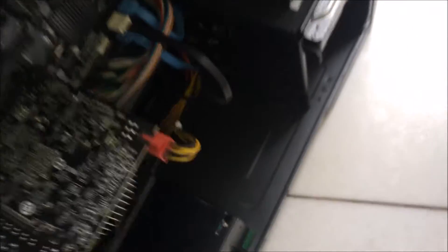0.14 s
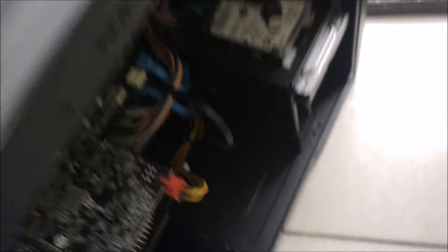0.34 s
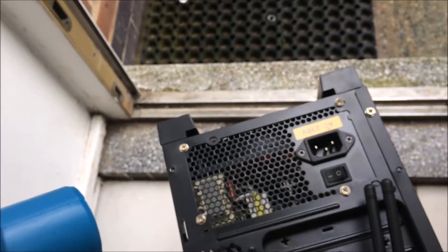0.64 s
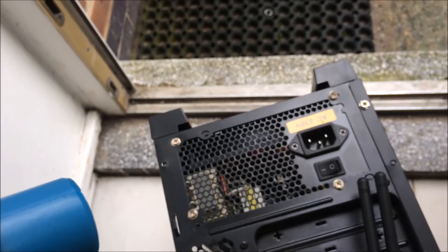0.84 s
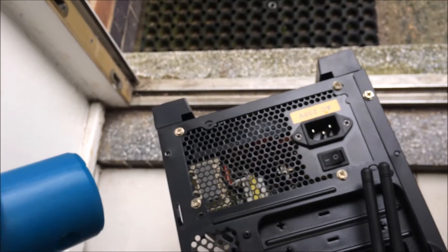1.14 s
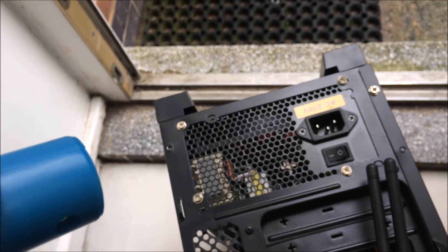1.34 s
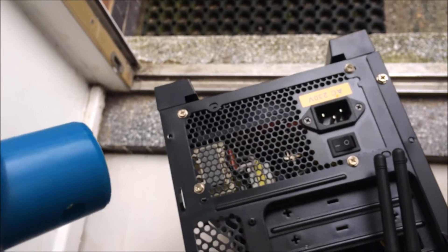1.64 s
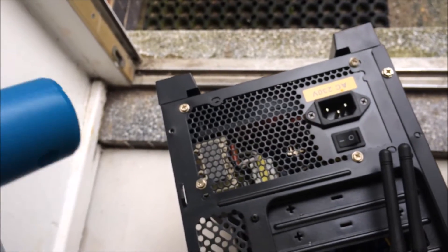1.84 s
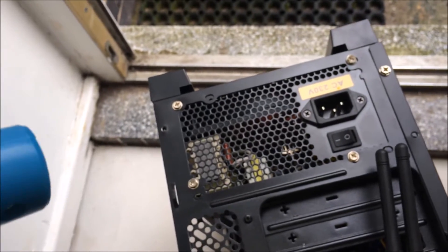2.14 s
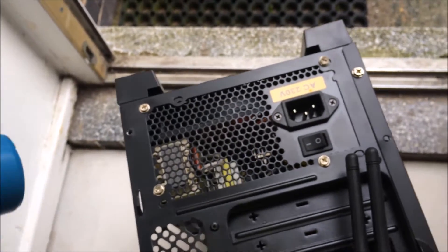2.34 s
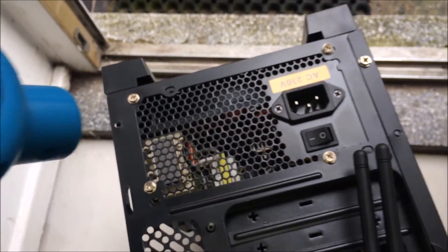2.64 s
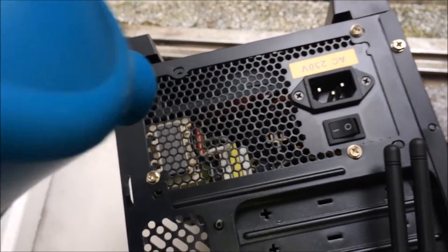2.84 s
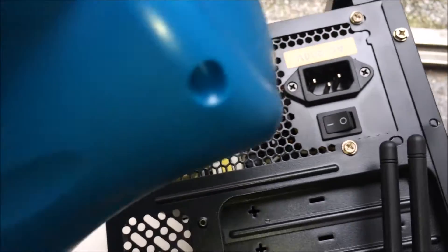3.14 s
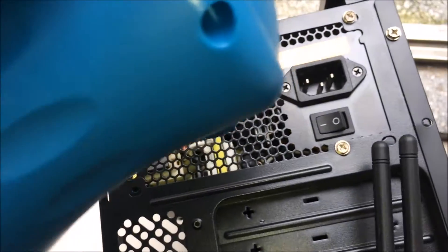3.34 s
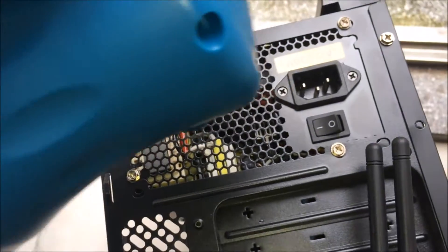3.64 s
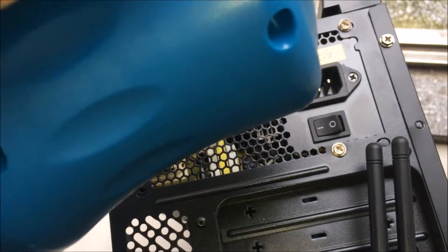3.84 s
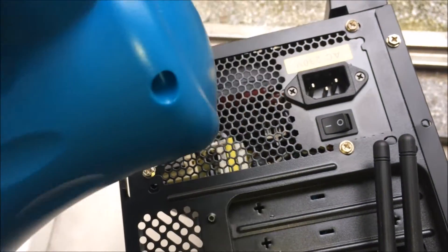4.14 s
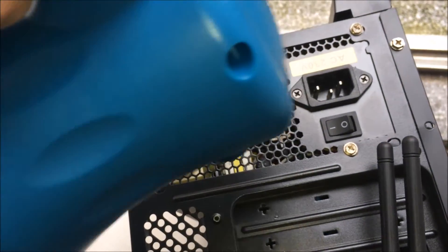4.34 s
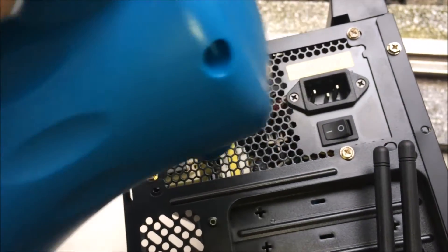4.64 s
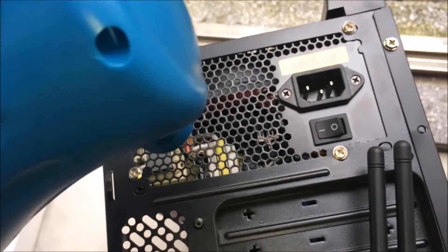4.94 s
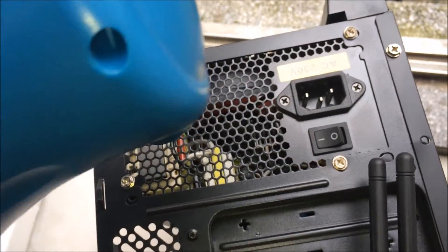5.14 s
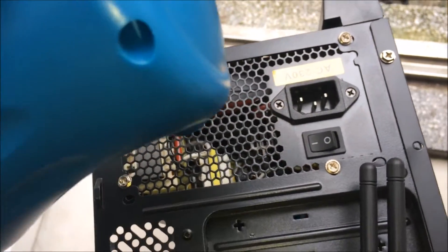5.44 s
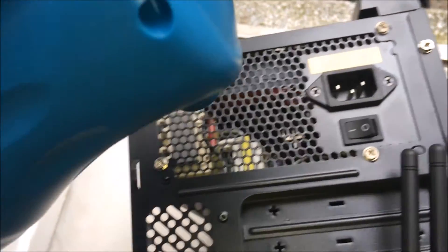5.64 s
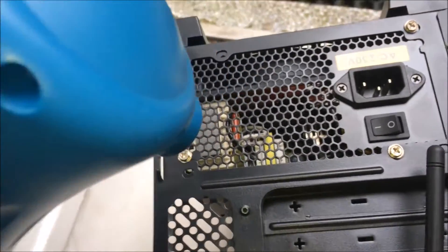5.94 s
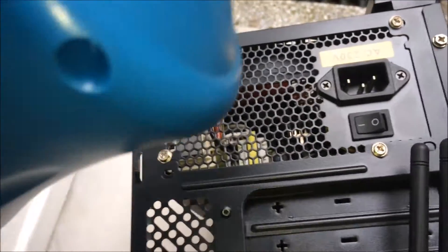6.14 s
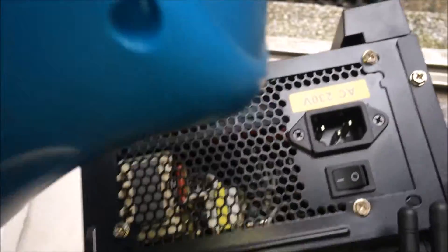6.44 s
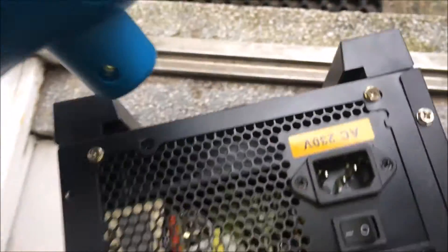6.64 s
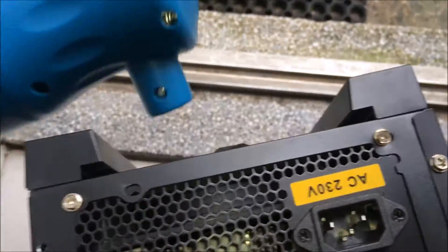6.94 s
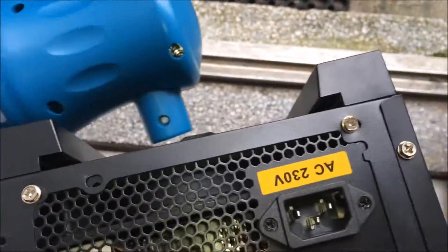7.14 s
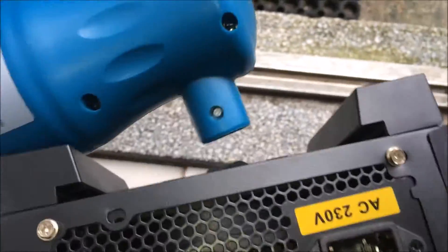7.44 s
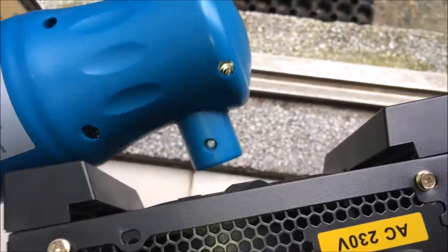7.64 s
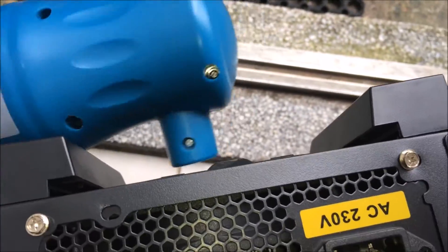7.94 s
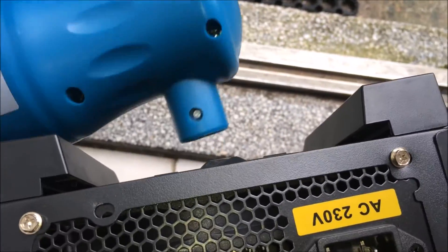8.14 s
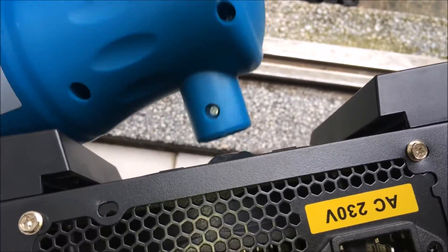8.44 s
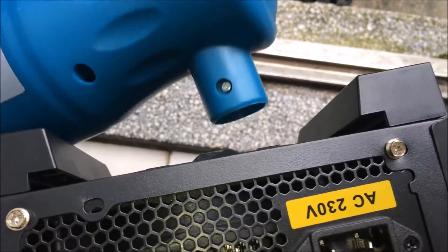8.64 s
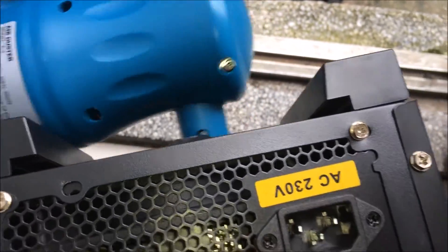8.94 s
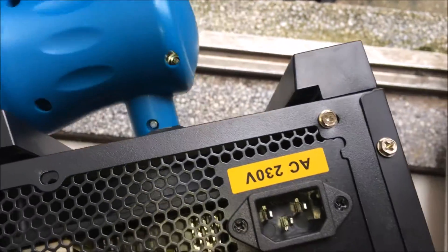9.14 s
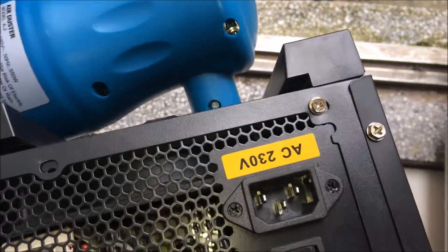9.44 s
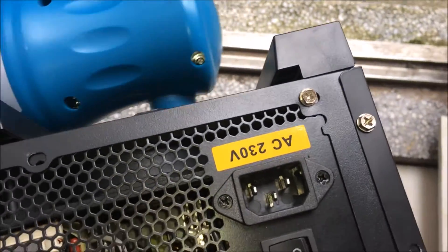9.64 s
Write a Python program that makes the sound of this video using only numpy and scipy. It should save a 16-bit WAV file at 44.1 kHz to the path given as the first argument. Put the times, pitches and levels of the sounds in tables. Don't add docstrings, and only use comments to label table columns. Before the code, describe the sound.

Loud air blast with motor whine stops dead, a second of faint outdoor hush, a click, then the blower restarts and sweeps over a computer case.

```python
import sys
import numpy as np
from scipy import signal
from scipy.fft import rfft, irfft
from scipy.io import wavfile
from scipy.ndimage import uniform_filter1d

SR = 44100
rng = np.random.default_rng(int(sys.argv[2]) if len(sys.argv) > 2 else 0)


def amplitude_ratio(level_db):
    exponent = np.asarray(level_db, float) / 20
    return 10 ** exponent


def dump(signal):
    limited = np.clip(np.atleast_2d(signal).T, -1, 1)
    pcm = np.round(limited * 32767).astype(np.int16)
    wavfile.write(sys.argv[1], SR, pcm)


N = 432180
TIME_S = np.arange(N) / SR


def rms_one(x):
    return x / np.sqrt(np.mean(x ** 2) + 1e-20)


def in_time(*tables):
    s, *columns = np.transpose(np.vstack(tables))
    return [np.interp(TIME_S, s, c) for c in columns]


def at_hz(points, hz):
    table_hz, table_db = np.transpose(points)
    return np.interp(np.log(hz), np.log(table_hz), table_db)


def bump(s, half_s):
    return np.exp(-((TIME_S - s) / half_s) ** 2)


def drift(rate_hz):
    r = np.exp(-80 * np.pi * rate_hz / SR)
    noise = rng.standard_normal(N // 40 + 2002)
    slow = signal.lfilter([1], [1, -2 * r, r * r], noise)[2000:]
    return np.interp(np.arange(N) / 40, np.arange(len(slow)), rms_one(slow))


def band(x, low_hz, high_hz):
    edges_hz = [low_hz, min(high_hz, .45 * SR)]
    return signal.sosfilt(signal.butter(2, edges_hz, "band", fs=SR, output="sos"), x)


def phase(hz):
    return 2 * np.pi * np.cumsum(hz) / SR


def whistle(hz, width_hz):
    r = np.exp(-np.pi * 1.5 * width_hz / SR)
    gain = (1 - r * r) / 2
    section = [gain, 0, -gain, 1, -2 * r * np.cos(2 * np.pi * hz / SR), r * r]
    return signal.sosfilt([section, section], rng.standard_normal(N))


def rough_tone(hz, width_hz):
    turn = phase(hz)
    lowpass = signal.butter(2, width_hz / 2, fs=SR, output="sos")
    sway = signal.sosfilt(lowpass, rng.standard_normal((2, N)))
    return rms_one(sway[0] * np.cos(turn) + sway[1] * np.sin(turn))


def coloured(spectrum, lifts=()):
    hz = np.maximum(np.arange(N // 2 + 1) * SR / N, 1)
    lift_db = sum(d / (1 + (2 * (hz - f) / w) ** 2) for f, w, d in lifts)
    return hz, rfft(rng.standard_normal(N)) * amplitude_ratio(at_hz(spectrum, hz) + lift_db)


def shared_out(spectrum, lifts, bands, levels_db, patchy_db, flutter_db):
    hz, noise = coloured(spectrum, lifts)
    centres = np.log([np.sqrt(a * b) for a, b in bands])
    power = [2 * np.sum(abs(noise[(hz > a) & (hz < b)]) ** 2) for a, b in bands]
    mean_db = 10 * np.log10(power) - 20 * np.log10(N)
    change_db = np.array(levels_db) - mean_db[:, None]
    out, together = 0, drift(9.0)
    for k in range(29):
        part = irfft(noise * np.clip(1 - abs(3 * np.log2(hz / 25) - k), 0, 1), N)
        place = np.interp(np.log(25 * 2 ** (k / 3)), centres, np.arange(len(bands)))
        low = min(int(place), len(bands) - 2)
        share = place - low
        db = (1 - share) * change_db[low] + share * change_db[low + 1]
        out = out + part * amplitude_ratio(db + patchy_db * drift(4.4) + flutter_db * together)
    return out


# time in seconds, share of full speed.
SPIN_UP = [(1.88, .3), (1.92, .56), (1.96, .66), (2.09, .84), (2.25, .935), (2.45, .975), (2.7, .995),
           (3.0, 1.0)]


def spin():
    return np.where(TIME_S < 1, 1, in_time(SPIN_UP)[0])


POSE_STARTS_S = [
    0,
    1.2,
    3.05,
    6.75,
    9.0,
]


def poses():
    blend_s = .25
    begun = [np.clip((TIME_S - s) / blend_s + 1, 0, 1) for s in POSE_STARTS_S]
    return -np.diff(begun + [0 * TIME_S], axis=0)


# frequency in Hz, density in dB per Hz.
RUSH_SPECTRUM = [(15, -64), (25, -49.5), (119, -21), (368, -16), (631, -7), (684, -6.5), (741, -6),
                 (970, -11), (2060, -9.5), (2920, -12), (3630, -11), (5430, -16), (6920, -15.5),
                 (11200, -23.5), (15500, -31)]
# frequency in Hz, width in Hz, lift in dB.
HOUSING = [(493, 32, 4.5), (1720, 67, 2), (2590, 350, 3.5), (3334, 330, 1), (4500, 120, 1.5),
           (6900, 900, 0)]
# time in seconds, level in dB.
FLOW = [
    [(0, -14.5), (.5, -16)],
    [(1.9, -23.5), (1.95, -15), (2.1, -13), (2.6, -14), (3.1, -15), (3.7, -15.5), (4.4, -14.5), (5.3, -15),
     (5.6, -15), (6.3, -14), (6.85, -13), (7.05, -15), (7.4, -13.5), (8.8, -13), (9.4, -15.5), (9.8, -13)],
]
# rumble, panel, cavity, gap, low jet, mid jet, high jet, hiss, in dB over the flow.
POSE_COLOURS_DB = [(-12.5, -18.5, -14.5, -15, -6.5, -6, -4.5, -14.5),
                   (-10.5, -15.5, -10, -13, -5.5, -4.5, -5, -14),
                   (-15.5, -20.5, -9.5, -15.5, -6.5, -5.5, -6, -11),
                   (-18.5, -20.5, -14, -14.5, -7.5, -4.5, -5, -10),
                   (-19.5, -19, -14.5, -13, -3.5, -4, -5, -10.5)]
# dB per decade of speed, for the same eight bands.
SPEED_DB_PER_DECADE = [-11, -13, 33, 5.0, 2, 6, 11, 30.0]
# time in seconds, half length in seconds, pitch in Hz, spread in octaves, lift in dB.
CROSSINGS = [(3.436, 0.13, 800, 0.56, 4.5), (3.977, 0.16, 750, 0.33, 6.5), (4.347, .12, 2600, 0.61, 7),
             (4.628, 0.23, 820, .4, 7.5), (4.6, 0.17, 1600, 0.69, 3.5), (4.675, 0.052, 150, 0.79, 10),
             (5.0, 0.18, 2220, 1, 3), (6.128, .12, 750, .4, 4), (6.445, 0.049, 800, .6, 8),
             (6.828, 0.027, 11200, 0.52, 4.5), (7.0, 0.13, 330, 1, 6.5), (7.05, .08, 11000, 1, -4),
             (7.4, .12, 1500, 0.5, 4), (9.196, 0.12, 2740, 0.78, 4.5), (9.548, 0.074, 2000, .6, 2)]


def rush(held):
    bands_hz = [(60, 300), (320, 440), (700, 900), (980, 1250),
                (1400, 2800), (2800, 5500), (5500, 9000), (9000, 15000)]
    levels_db = in_time(*FLOW)[0] + np.transpose(POSE_COLOURS_DB) @ held
    levels_db = levels_db + np.outer(SPEED_DB_PER_DECADE, np.log10(spin()))
    for s, half_s, hz, octaves, db in CROSSINGS:
        near = [np.exp(-(np.log2(np.sqrt(a * b) / hz) / octaves) ** 2) for a, b in bands_hz]
        levels_db = levels_db + db * np.outer(near, bump(s, half_s))
    return shared_out(RUSH_SPECTRUM, HOUSING, bands_hz, levels_db, patchy_db=1.27, flutter_db=0.0)


# frequency in Hz, width in Hz, level in dB.
POSE_WHISTLES = [
    [(2180, 230, 1), (2660, 62, -4), (3490, 65, -3), (3780, 61, -3), (4390, 120, -4), (6120, 180, -6.5),
     (7110, 160, -4), (9670, 35, -15)],
    [(2110, 260, 6), (3685, 230, -2.5), (4330, 260, -5), (5970, 200, 3.5), (6920, 35, 7), (7830, 110, 0),
     (10000, 160, -22.5)],
    [(1717, 450, -0.5), (3590, 170, 3.5), (4500, 95, 3), (4810, 21, 5), (6460, 1600, -12), (9300, 34, 2.5)],
    [(1303, 260, -2), (1867, 260, -0.5), (2615, 73, -4), (3810, 200, -0.5), (4970, 690, -5)],
    [(2044, 260, -0.5), (2550, 140, -12), (3144, 82, -3.5), (5910, 69, -7)],
]
WHISTLE_DB = [10.2, 5.4, 4.2, 4, 5]


def gap_whistles(held):
    flicker_db, db_per_decade = 0.9, 77
    base_db = in_time(*FLOW)[0] + db_per_decade * np.log10(spin())
    out = 0
    for weight, peaks, pose_db in zip(held, POSE_WHISTLES, WHISTLE_DB):
        for hz, width_hz, db in peaks:
            level_db = base_db + pose_db + db + flicker_db * drift(2.5)
            out = out + weight * amplitude_ratio(level_db) * whistle(hz, width_hz)
    return out


# multiple of shaft speed, level in dB relative to the whine.
BLADE_ORDERS = [(7, -19), (14, -31.5), (.18, -24.5)]


def motor():
    shaft_hz, sag_hz_per_s, whine_db = 689.7, .27, -22.5
    speed = spin()
    hz = (shaft_hz - sag_hz_per_s * TIME_S) * speed * (1 + .0012 * drift(3.8))
    turn = phase(hz)
    level = np.sqrt(2) * amplitude_ratio(whine_db + 90 * np.log10(speed))
    out = level * amplitude_ratio(1.7 * drift(14.0)) * np.sin(turn)
    for order, db in BLADE_ORDERS:
        out += level * amplitude_ratio(db + 3.0 * drift(8.0)) * np.sin(order * turn)
    third_order = np.exp(-((speed - .76) / .14) ** 2)
    blade_order = np.exp(-((speed - .91) / .05) ** 2)
    out += amplitude_ratio(-19.5) * third_order * rough_tone(3 * hz, 150)
    return out + amplitude_ratio(-24.5) * blade_order * rough_tone(7 * hz, 90)


def close_walls(x):
    echo_db, decay_s, low_hz, hand_shift_s = -10.5, .008, 700, .4
    u = np.arange(round(5 * decay_s * SR)) / SR
    step = round(hand_shift_s * SR)
    window = np.sin(np.pi * np.arange(2 * step) / (2 * step))
    bright = np.pad(band(x, low_hz, SR), (step, 2 * step))
    out = np.zeros(len(bright) + len(u))
    for i in range(0, len(bright) - 2 * step, step):
        echoes = rng.standard_normal(len(u)) * np.exp(-u / decay_s) * (u > .0008)
        heard = signal.fftconvolve(bright[i:i + 2 * step] * window, rms_one(echoes))
        out[i:i + len(heard)] += amplitude_ratio(echo_db) * heard / np.sqrt(len(u))
    return amplitude_ratio(-0.3) * (x + out[step:step + N])


# time in seconds,
# level in dB.
SCENE_CHANGE = [(.5029, 0), (.5033, -20), (.5075, -25), (.5085, -48), (.516, -66), (.534, -68), (.54, -80)]


def running():
    first = amplitude_ratio(in_time(SCENE_CHANGE)[0]) * (TIME_S < .54)
    second = np.clip((TIME_S - 1.879) / .003, 0, 1)
    return np.where(TIME_S < 1, first, second)


# frequency in Hz, density in dB per Hz.
STREET_SPECTRUM = [(15, -49), (25, -23), (49, -3.5), (121, -11.5), (158, -3.5), (181, -9), (344, -20.5),
                   (655, -19), (769, -13.5), (1060, -21.5), (1580, -24.5), (3090, -40), (15000, -48)]
# time in seconds, level in dB.
TRAFFIC = [(0.6, -58), (1.048, -57), (1.38, -53.5), (1.76, -56), (1.87, -55)]
# time in seconds, half length in seconds, level in dB.
RUSTLES = [
    (.65, .04, -74),
    (.93, .04, -72),
    (1.23, .07, -74),
    (1.59, .012, -72),
    (1.868, 0.013, -52),
]


def street():
    leaves_db = -77.5
    traffic_db = in_time(TRAFFIC)[0]
    levels_db = [traffic_db + 1.0, leaves_db + 0 * traffic_db]
    far = shared_out(STREET_SPECTRUM, (), [(40, 500), (2500, 5300)], levels_db, patchy_db=2.3, flutter_db=-1.5)
    rustling = sum(amplitude_ratio(db) * bump(s, half_s) for s, half_s, db in RUSTLES)
    out = far + rustling * rms_one(whistle(3420, width_hz=500))
    return out * np.clip((TIME_S - .585) / .02, 0, 1)


# time in seconds, peak in dB, low edge in Hz, high edge in Hz, T60 in seconds.
CLICKS = [
    (1.687, -34, 1700, 3280, .05),
    (1.756, -29, 1490, 7000, 0.096),
    (1.879, -2.5, 1800, 9000, .018),
]
# start in seconds, end in seconds, pitch in Hz, level in dB.
SQUEAK = (1.913, 1.926, 3082, -11.5)


def switch():
    out, t = np.zeros(N), np.arange(SR // 5) / SR
    for s, db, low_hz, high_hz, t60_s in CLICKS:
        noise = rng.standard_normal(len(t))
        tick = rms_one(band(noise, low_hz, high_hz)) + .15 * noise
        envelope = amplitude_ratio(-60 * t / t60_s) * np.minimum(t / .0006, 1)
        out[round(s * SR):][:len(t)] += amplitude_ratio(db - 6) * tick * envelope
    start, end, hz, db = SQUEAK
    u = np.arange(round((end - start) * SR)) / SR
    wobble = 1 + 0.36 * np.sin(2 * np.pi * 170 * u)
    swell = np.sin(np.pi * u / u[-1]) ** .4
    chirp = np.sin(2 * np.pi * (hz * u + 5000 * u ** 2))
    out[round(start * SR):][:len(u)] += amplitude_ratio(db) * wobble * swell * chirp
    return out


# time in seconds, half length in seconds, pitch in Hz, level in dB over the flow.
SINGING = [(3.4, .2, 4500, -14), (3.45, 0.21, 2670, -26), (5.5, 0.37, 4500, -18), (8.65, 0.41, 3680, -11),
           (9.53, .1, 1980, -17)]


def singing_holes():
    flow_db = in_time(*FLOW)[0]
    return sum(bump(s, half_s) * amplitude_ratio(flow_db + db) * rms_one(whistle(hz, width_hz=140))
               for s, half_s, hz, db in SINGING)


# time in seconds, peak in dB, pitch in Hz.
THUMPS = [
    (7.869, -21, 78.1),
    (8.389, -16, 123),
]


def gusts():
    out = np.zeros(N)
    for s, db, hz in THUMPS:
        t = TIME_S - s - .008
        out -= amplitude_ratio(db) * np.cos(2 * np.pi * hz * t) * np.exp(-(t / .007) ** 2)
    return out


# time in seconds, pitch in Hz, level in dB.
CASE_FAN = [
    (9.35, 149.7, -52),
    (9.45, 165, -28.5),
    (9.6, 183.4, -36.5),
    (9.8, 200, -38.5),
]


def case_fan():
    hz, db = in_time(CASE_FAN)
    return amplitude_ratio(db) * (TIME_S > 9.3) * amplitude_ratio(3.0 + 1.5 * drift(7.0)) * np.sin(phase(hz))


def scene():
    held = poses()
    air = rush(held) + gap_whistles(held) + singing_holes()
    blower = running() * (close_walls(air) + motor() + case_fan())
    mono = blower + street() + switch() + gusts()
    return np.array([mono, mono])


# time in seconds, lowest frequency in Hz, share of lines kept.
THINNED = [(.135, 4500, .1), (.2, 100, .12), (.67, 2000, .1), (.82, 2300, .1), (.92, 2000, .1),
           (.99, 2000, .1), (1.1, 2000, .1), (3.527, 300, .12), (3.676, 300, .1), (3.72, 1500, .12),
           (4.335, 200, .12), (4.897, 1000, .15), (5.3, 200, .1), (9.35, 100, .15), (9.523, 900, .15)]


def thin_out(x):
    out, size = x.copy(), 1536
    window, hz = np.sin(np.pi * np.arange(size) / size), np.arange(size // 2 + 1) * SR / size
    for s, from_hz, kept in THINNED:
        i = round(s * SR) - size // 2
        lines = rfft(out[i:i + size] * window)
        tall = abs(lines) / uniform_filter1d(abs(lines), size=60)
        lost = (tall < np.quantile(tall, 1 - kept)) & (hz > from_hz)
        out[i:i + size] -= window * irfft(lines * lost, size)
    return out


PATCH_EDGES_HZ = [4100, 5400, 6900, 8300, 9000, 9700, 11000, 12000]


def noise_patches(x):
    patches_per_s, size = 5, 2048
    out, last = np.array([x, x]), len(PATCH_EDGES_HZ) - 1
    window, hz = np.sin(np.pi * np.arange(size) / size), np.arange(size // 2 + 1) * SR / size
    for when, which, wide in rng.random((round(patches_per_s * N / SR), 3)):
        i = int(when * (N // 1024 - 3)) * 1024 + 175
        k = int(which * last)
        top = min(k + 1 + int(wide > .5), last)
        inside = (hz > PATCH_EDGES_HZ[k]) & (hz < PATCH_EDGES_HZ[top])
        lines = rfft(x[i:i + size] * window) * inside
        level = np.sqrt(np.mean(abs(lines[inside]) ** 2))
        noise = level * inside * np.exp(2j * np.pi * rng.random(len(hz)))
        out[:, i:i + size] += window * irfft(noise, size) * [[1], [-1]]
    return out


def band_limit(x):
    return signal.sosfilt(signal.butter(12, 15660, fs=SR, output="sos"), x)


def record(dry):
    top_cut = signal.cheby2(16, 60, 15750, fs=SR, output="sos")
    mono = signal.sosfilt(top_cut, np.clip(thin_out(dry[0]), -1, 1))
    mix = noise_patches(mono)
    return band_limit(mix)


dry = scene()
out = record(dry)
dump(out)
```